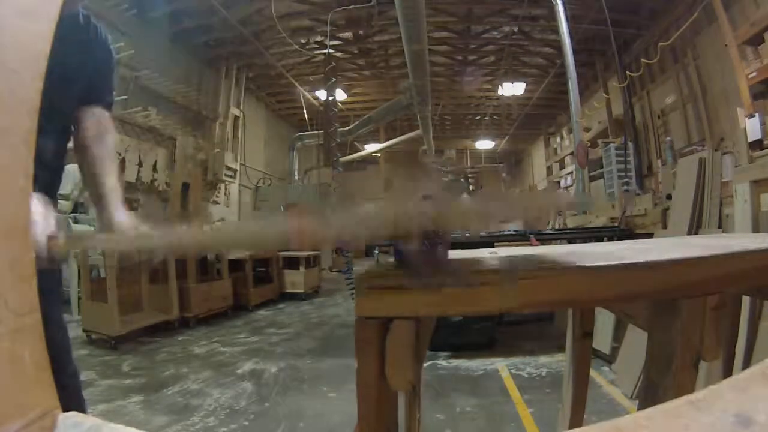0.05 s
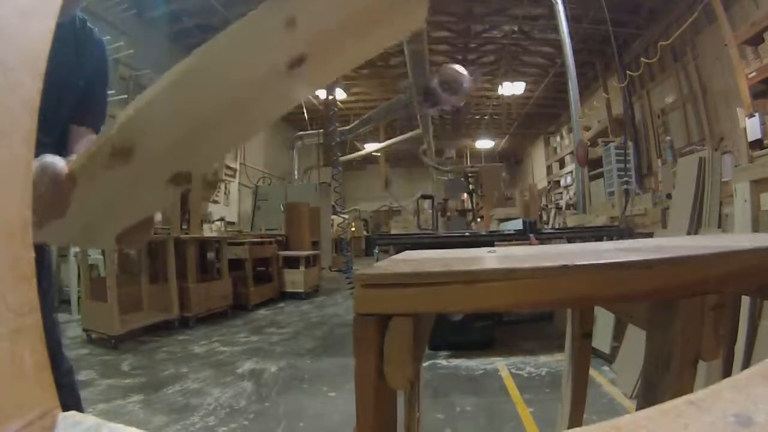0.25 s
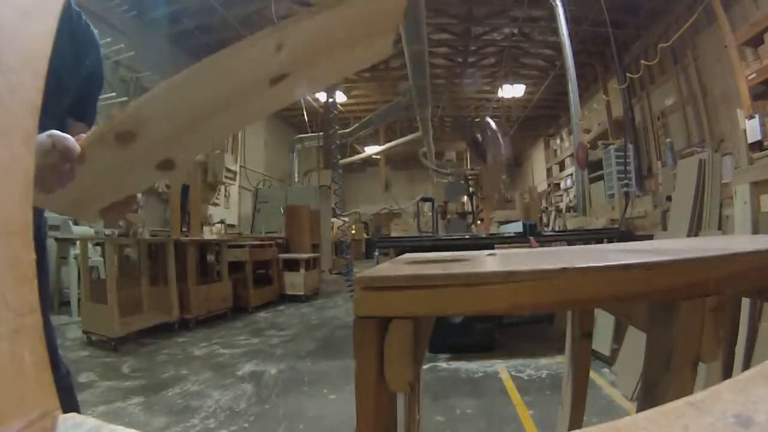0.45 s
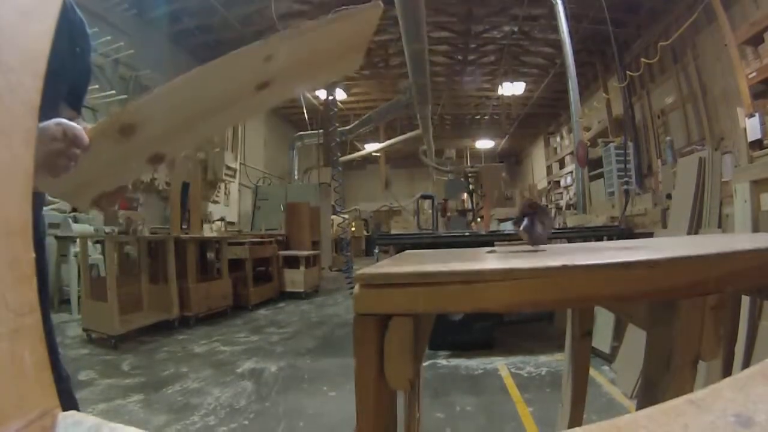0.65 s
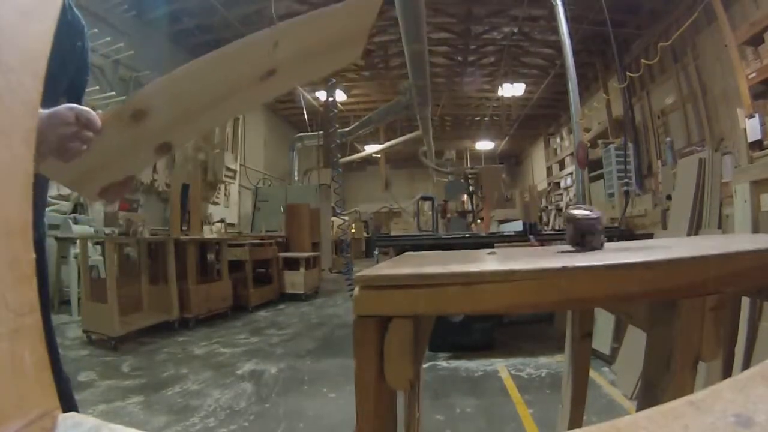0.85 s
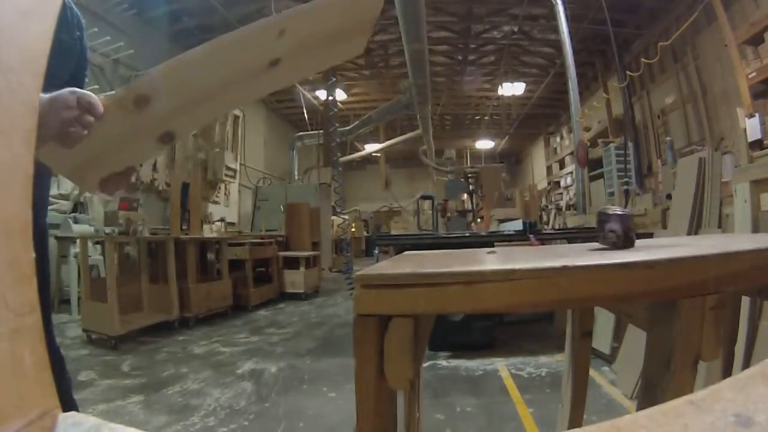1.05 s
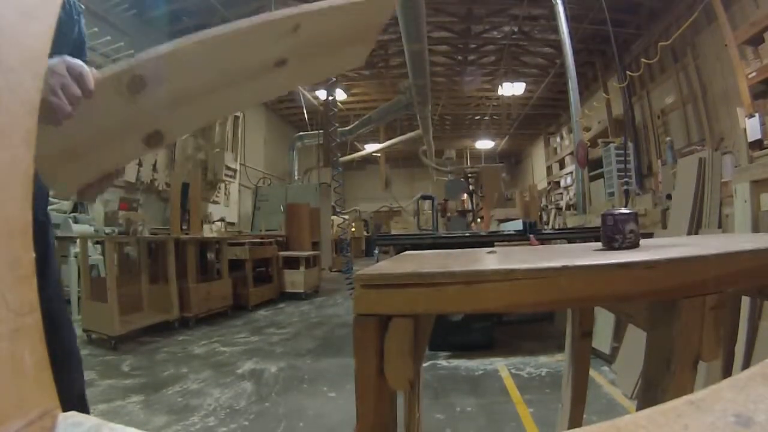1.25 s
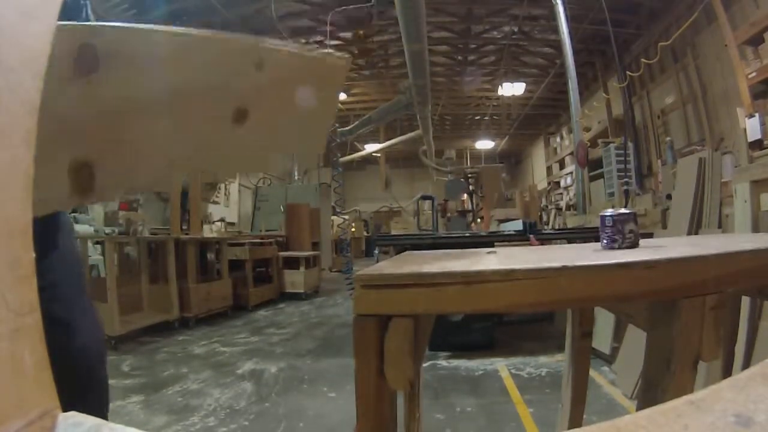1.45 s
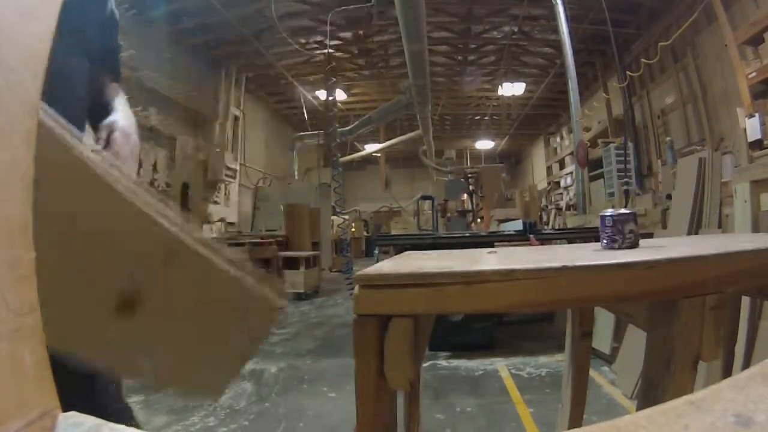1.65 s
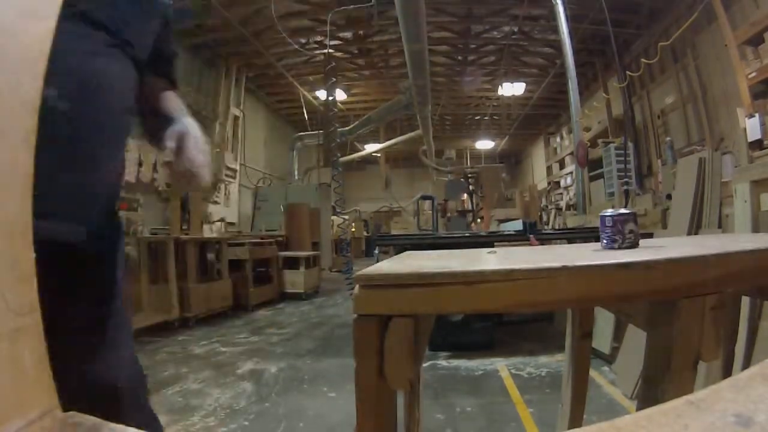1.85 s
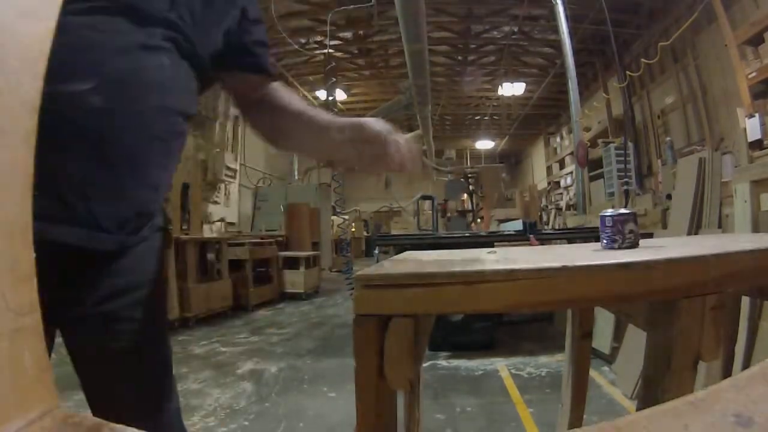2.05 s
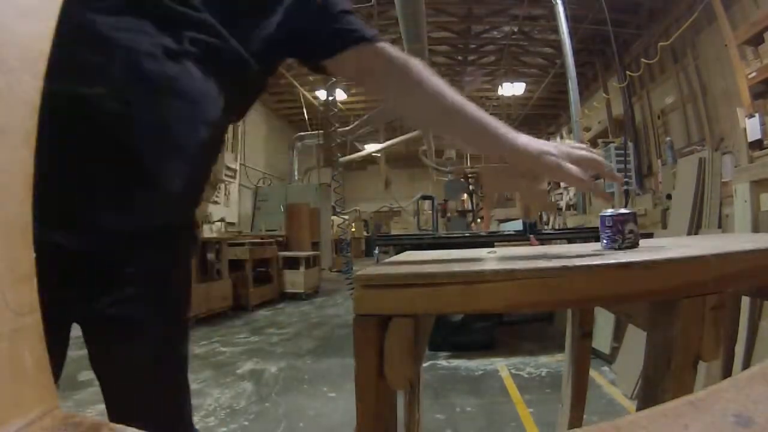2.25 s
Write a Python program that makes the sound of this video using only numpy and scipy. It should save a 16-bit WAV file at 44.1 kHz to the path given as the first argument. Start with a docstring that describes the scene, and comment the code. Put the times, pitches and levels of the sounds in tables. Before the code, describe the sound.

A wooden board smacks an aluminum can flat, and the can clatters onto a workbench.

```python
"""Steady ventilation hiss in a large workshop; then a wooden board smacks an aluminium can flat.
The can wall buckles in about 10 ms, rings board and can, and overloads the microphone.
The workbench booms and keeps rocking on its legs. The can flies up, ticks once in the air
as its dented wall springs back, lands, bounces and wobbles to rest."""
import sys
import numpy as np
from scipy import signal
from scipy.fft import rfft, irfft
from scipy.io import wavfile

SR = 44100
rng = np.random.default_rng(int(sys.argv[2]) if len(sys.argv) > 2 else 0)


def int16_out(signal):
    """Quantize to a 16-bit WAV file."""
    q = np.round(np.clip(np.atleast_2d(signal).T, -1, 1) * 32767)
    wavfile.write(sys.argv[1], SR, q.astype(np.int16))


N = 105840
T = np.arange(N) / SR

# ventilation spectrum: (frequency [Hz], relative density [dB])
HISS_SPECTRUM = [(15, -38), (25, -6.5), (93, -7), (193, -15), (215, -4), (252, -17), (289, 0.5), (339, -12),
                 (421, -14.5), (468, -14), (508, -11), (630, -11), (1050, -16.5), (1270, -11.5),
                 (1700, -10), (2000, -18), (2230, -10), (2760, -22), (5710, -22), (6530, -30),
                 (15400, -44.5)]
# duct resonances: (frequency [Hz], rms level [dB], t60 [s])
DUCT_RESONANCES = [(228, -68, 0.096), (290, -64.5, .1), (620, -76, .1), (1280, -68.5, .05)]
# can wall gives way: (time [s], hold [s], level [dB], treble weight [ratio])
WALL_CRUSHES = [(0.1288, 0.0022, -7, .15), (0.1314, 0.0071, -7, 0), (0.15, .003, -28, 1.14)]
# buckling metal: (frequency [Hz], relative density [dB])
CRACK_SPECTRUM = [(50, -37), (200, -20), (500, -18), (1000, -7), (1700, 1.5), (2000, -2.5), (2450, 1.5),
                  (2750, -4.5), (4000, -4), (4800, -0.5), (5600, -6), (6300, -17), (7500, -14.5),
                  (9000, -27.5), (12000, -26), (15000, -43)]
# board and can together: (frequency [Hz], level [dB], t60 [s])
BOARD_CAN_MODES = [(589, -30.5, .16), (904, -34.5, .15), (1227.3, -16.5, .13), (1430, -22.5, .08),
                   (1628, -25.5, .06), (1749, -16, .07), (1766, -20, .06), (2214, -23, 0.21),
                   (2545, -25.5, 0.24), (3075, -25.5, .07), (3295, -24.5, .07), (3485, -24.5, .06),
                   (4800, -23.5, .05), (5032, -28, .08)]
# bench top, boom: (frequency [Hz], level [dB], t60 [s])
TOP_BOOM_MODES = [(66, -32, .5), (88, -32.5, .4), (170.7, -23.5, 0.16), (196, -28.5, 0.31),
                  (247, -28, 0.18), (260, -25.5, .2), (263.3, -34.5, .25)]
# loose bench parts: (frequency [Hz], relative density [dB])
SHUDDER_SPECTRUM = [(25, -14.5), (60, 4.5), (130, -1), (200, 3.5), (300, -2), (420, -27.5), (1000, -46.5),
                    (4000, -70.5)]
# bench top, knock: (frequency [Hz], level [dB], t60 [s])
TOP_KNOCK_MODES = [(292, -17.5, .35), (504.7, -4, .07), (618, 3.5, .065), (960, -18, 0.041),
                   (1388, -8.5, 0.058)]
# bench rocks on its legs: (time [s], impulse [dB], contact length [s])
LEG_KNOCKS = [(0.24, -31, 0.0059), (0.27, -40.5, 0.0096), (0.37, -33, 0.0074), (0.426, -31.5, 0.0083),
              (0.497, -34.5, 0.0062), (0.579, -33.5, 0.0064), (0.643, -34.5, 0.0063), (0.721, -33, 0.0057),
              (0.779, -33, 0.0071), (0.853, -38, 0.0081), (0.963, -38, 0.0084), (1.021, -38, 0.011)]
# bench frame: (frequency [Hz], level [dB], t60 [s])
BENCH_FRAME_MODES = [(13, -11.5, 1.2), (27.45, -3.5, 0.14), (44.66, -6, 1.2), (65, -8, 0.24),
                     (88.2, -6.5, 0.17), (135, -11, .05), (180.4, -1.5, 0.1), (230, 2, .12)]
# dented wall: (frequency [Hz], level [dB], t60 [s])
DENT_MODES = [(1400, -71, 0.015), (2160, -38, .035), (3340, -34, 0.022), (3940, -37.5, 0.024),
              (5720, -40, 0.021), (8600, -46.5, 0.013), (11300, -52, 0.0037), (14200, -71, .005)]
# can meets bench: (time [s], clatter [dB], clatter cut-off [Hz], knock [dB], hollow ring [dB])
CAN_CONTACTS = [(0.6257, -32.5, 18100, -27, -52), (0.6395, -33.5, 5900, -34, -60),
                (0.7545, -40, 2600, -49, -30.5), (0.814, -42.5, 7000, -59, -59),
                (0.862, -45.5, 2580, -57, -62), (0.946, -44, 5030, -56, -55), (1.117, -47, 2400, -55, -53),
                (1.250, -44.5, 3600, -51.5, -60), (1.315, -48, 2500, -59, -70)]
# folded metal: (frequency [Hz], relative density [dB])
CLATTER_SPECTRUM = [(200, -21), (600, 3), (1000, 0.5), (1600, 5), (2400, -1), (3500, -10.5), (5200, -5.5),
                    (6400, -14), (8000, -15.5), (11000, -26.5), (15000, -28)]
# hollow of the can: (frequency [Hz], level [dB], t60 [s])
CAN_HOLLOW_MODES = [(750.7, 2, 0.088), (760, -17.5, 1), (864, -22, 0.089), (1300, -9, 0.093),
                    (1550, -21, 0.46), (2363, -19.5, 0.26), (2960, -23.5, 0.13)]
# workshop reverberation: (frequency [Hz], gain [dB])
TAIL_SPECTRUM = [(100, -13.5), (300, -9.5), (700, -16), (1200, -9), (1800, -12.5), (2900, -12.5),
                 (4200, -22.5), (5200, -14.5), (7500, -18), (14000, -20.5)]
# its decay: (frequency [Hz], t60 [s])
TAIL_DECAY = [(100, .7), (300, 0.47), (600, .6), (1500, 0.46), (3000, 0.54), (5000, .54), (7500, .42),
              (14000, .24)]

THIN_BELOW_HZ = 270   # small objects radiate little bass


def from_db(db):
    """Decibels to gain."""
    return 10 ** (np.asarray(db) / 20)


def rms_one(x):
    """Scale to unit rms."""
    return x / np.sqrt(np.mean(x ** 2) + 1e-20)


def at_hz(points, hz):
    """Read a table on a log-frequency axis."""
    table_hz, values = np.transpose(points)
    return np.interp(np.log(np.maximum(hz, 1)), np.log(table_hz), values)


def cut_below(x, hz):
    """Second-order high-pass."""
    return signal.sosfilt(signal.butter(2, hz, "high", fs=SR, output="sos"), x + 1e-18)


def colour(x, spectrum):
    """Minimum-phase filter of unit power gain with the given spectrum."""
    size = 8192
    magnitude = rms_one(from_db(at_hz(spectrum, np.arange(size // 2 + 1) * SR / size)))
    cepstrum = irfft(np.log(magnitude))
    cepstrum[1:size // 2] *= 2
    cepstrum[size // 2 + 1:] = 0
    return signal.fftconvolve(x, irfft(np.exp(rfft(cepstrum))))[:N]


def ring(x, hz, t60_s):
    """One mode: a unit click starts a decaying sine of height 1."""
    radius, step_rad = from_db(-60 / (t60_s * SR)), 2 * np.pi * hz / SR
    return signal.lfilter([0, np.sin(step_rad)], [1, -2 * radius * np.cos(step_rad), radius ** 2], x + 1e-18)


def body(force, modes):
    """Parallel modes driven by one force."""
    return sum(from_db(db) * ring(force, hz, t60_s) for hz, db, t60_s in modes)


def clicks(times_s, levels_db):
    """One click per contact."""
    force = np.zeros(N)
    np.add.at(force, (np.atleast_1d(times_s) * SR).astype(int), from_db(levels_db))
    return force


def ventilation(hiss_db=-55):
    """Steady air hiss plus noise-driven duct resonances."""
    hiss = from_db(hiss_db) * colour(rng.standard_normal(N), HISS_SPECTRUM)
    ducts = sum(from_db(db) * rms_one(ring(rng.standard_normal(N), hz, t60_s))
                for hz, db, t60_s in DUCT_RESONANCES)
    return hiss + ducts


def crumple(start_s, hold_s, release_s, buckles_per_s=9000, spread_db=5.5):
    """Dense run of tiny buckles: holds near rms 1, then dies away."""
    envelope = (T >= start_s) * np.exp(-np.maximum(T - start_s - hold_s, 0) / release_s)
    sizes = from_db(spread_db * np.minimum(rng.exponential(1, N), 2)) * rng.choice([-1, 1], N)
    run = envelope * sizes * (rng.random(N) < buckles_per_s / SR)
    for _ in range(2):   # whiten so no pitch stands out
        run = np.sqrt(envelope) * irfft(np.exp(1j * np.angle(rfft(run))), N)
    return rms_one(run) * np.sqrt(np.mean(envelope ** 2))


def smack(treble_hz=7870, treble_db=12):
    """The buckling wall cracks and rings board and can: (crack, ringing)."""
    force = ringing = 0
    for start_s, hold_s, db, treble_weight in WALL_CRUSHES:
        run = from_db(db) * crumple(start_s, hold_s, release_s=.0025)
        force = force + run + treble_weight * from_db(treble_db) * cut_below(run, treble_hz)
    for hz, db, t60_s in BOARD_CAN_MODES:
        unit_ring_rms = np.sqrt(t60_s * SR / N / (4 * np.log(1000)))
        ringing = ringing + from_db(db) * unit_ring_rms * rms_one(ring(force, hz, t60_s))
    return colour(force, CRACK_SPECTRUM), cut_below(ringing, THIN_BELOW_HZ)


def bench_boom(start_s=.148, swell_s=.011, shudder_db=-36.5, shudder_decay_s=.16):
    """The blow sets the top booming and loose parts shuddering."""
    age_s = np.maximum(T - start_s, 0)
    boom = body(clicks(start_s, levels_db=3), TOP_BOOM_MODES)
    shudder = from_db(shudder_db) * colour(rng.standard_normal(N), SHUDDER_SPECTRUM)
    swell = 1 - np.exp(-(age_s / swell_s) ** 2)
    return (boom + shudder * np.exp(-age_s / shudder_decay_s)) * swell


def board_slam():
    """The board bottoms out and knocks the bench top."""
    return cut_below(body(clicks(times_s=.151, levels_db=-22.5), TOP_KNOCK_MODES), THIN_BELOW_HZ)


def bench_rocking():
    """Soft knocks on the legs drive the frame."""
    force = 0
    for start_s, db, contact_s in LEG_KNOCKS:
        pulse = np.sin(np.pi * np.clip((T - start_s) / contact_s, 0, 1)) ** 2
        force = force + from_db(db) * 2 / (contact_s * SR) * pulse
    return -body(force, BENCH_FRAME_MODES)


def dent_tick():
    """The dented wall snaps back in flight."""
    return body(clicks(times_s=.418, levels_db=0), DENT_MODES)


def can_landings():
    """Each touch rattles the metal, knocks the top and rings the can's hollow: (clatter, tones)."""
    times_s, clatter_db, cutoffs_hz, knock_db, hollow_db = np.transpose(CAN_CONTACTS)
    rattle = 0
    for start_s, db, hz in zip(times_s, clatter_db, cutoffs_hz):
        run = crumple(start_s, hold_s=.00071, release_s=.0055)
        lowpass = signal.butter(1, hz, fs=SR, output="sos")
        rattle = rattle + from_db(db) * signal.sosfilt(lowpass, run + 1e-18)
    knocks = body(clicks(times_s, knock_db), TOP_KNOCK_MODES)
    hollow = body(clicks(times_s, hollow_db), CAN_HOLLOW_MODES)
    return colour(rattle, CLATTER_SPECTRUM), cut_below(knocks + hollow, THIN_BELOW_HZ)


def workshop(x, delay_s=.0056, build_s=.012, early_db=-10.5, early_delay_s=.0062, early_decay_s=.024):
    """Scatter from the bench and nearby boards, then a diffuse tail, shorter in the treble."""
    edges_hz, white = np.geomspace(70, 17000, 15), rng.standard_normal((2, N))
    age_s, response = np.maximum(T - delay_s, 0), 0
    for k, (low_hz, high_hz) in enumerate(zip(edges_hz, edges_hz[1:])):
        hz = np.sqrt(low_hz * high_hz)
        bandpass = signal.butter(2, [low_hz, high_hz], "band", fs=SR, output="sos")
        envelope = from_db(-60 * age_s / at_hz(TAIL_DECAY, hz)) * (1 - np.exp(-age_s / build_s))
        tail = rms_one(signal.sosfilt(bandpass, white[k % 2]) * envelope)
        band_rms = np.sqrt(2 * (high_hz - low_hz) / SR / N)
        response = response + from_db(at_hz(TAIL_SPECTRUM, hz)) * band_rms * tail
    early = rng.standard_normal(N) * (T > early_delay_s) * np.exp(-T / early_decay_s)
    return signal.fftconvolve(x, response + from_db(early_db) * rms_one(early) / np.sqrt(N))[:N]


def scene():
    """Hiss, blow, bench and can; smack, slam and landings feed the room."""
    crack, ringing = smack()
    clatter, tones = can_landings()
    tones = tones + board_slam()
    room = workshop(crack + from_db(-11) * ringing + from_db(9) * clatter + from_db(-1.5) * tones)
    bench = bench_boom() + bench_rocking()
    return (ventilation() + crack + ringing + bench + dent_tick() + clatter + tones + room)[None]


def record(dry, overload_level=1.05, low_cut_hz=6, stopband_hz=15900):
    """Microphone: high-pass, soft overload, steep low-pass."""
    dry = signal.sosfilt(signal.butter(1, low_cut_hz, "high", fs=SR, output="sos"), dry)
    limited = dry / (1 + (dry / overload_level) ** 4) ** (1 / 4)
    return signal.sosfilt(signal.cheby2(16, 60, stopband_hz, fs=SR, output="sos"), limited)


dry = scene()
out = record(dry)
int16_out(out)
```